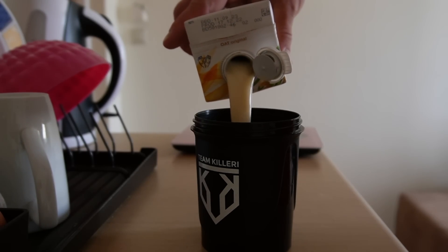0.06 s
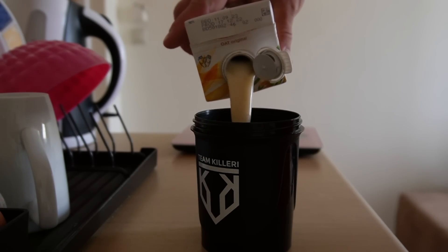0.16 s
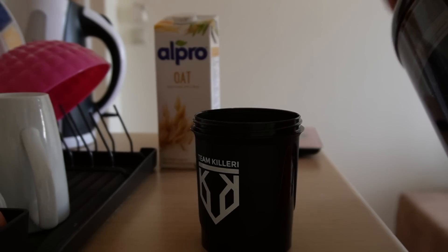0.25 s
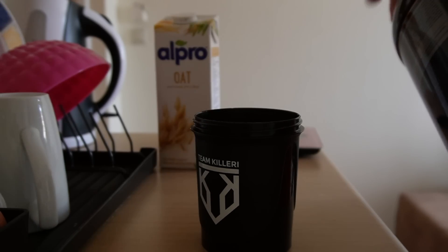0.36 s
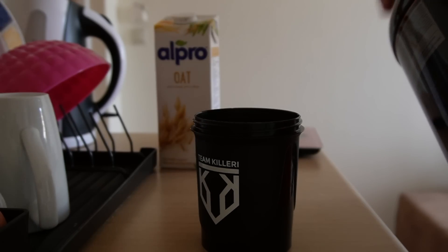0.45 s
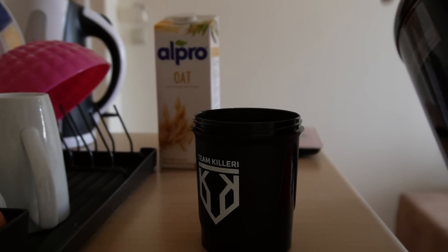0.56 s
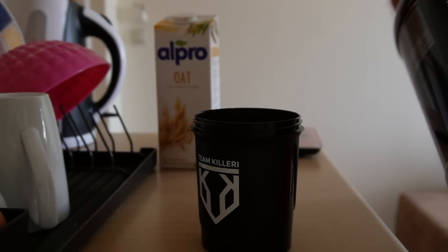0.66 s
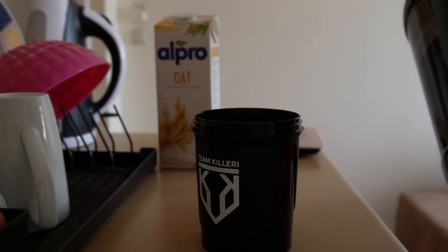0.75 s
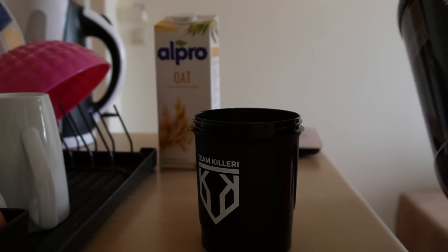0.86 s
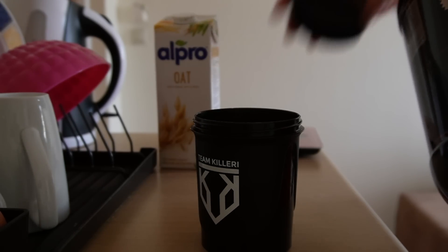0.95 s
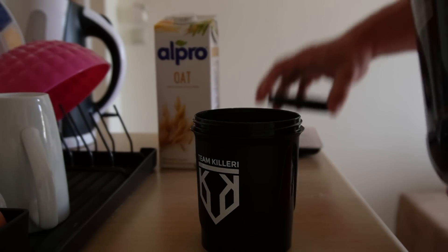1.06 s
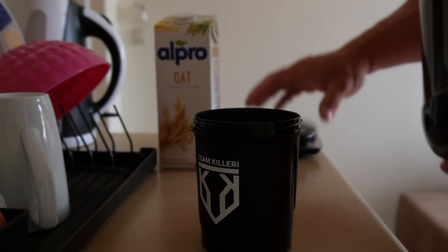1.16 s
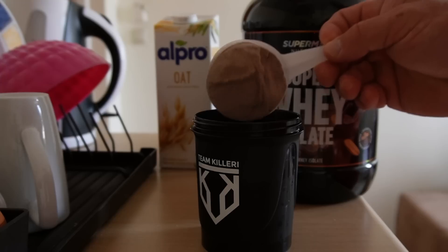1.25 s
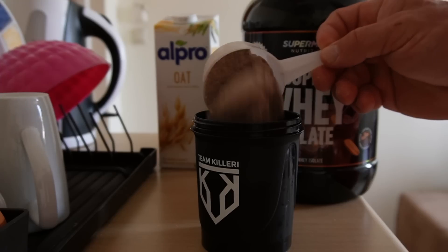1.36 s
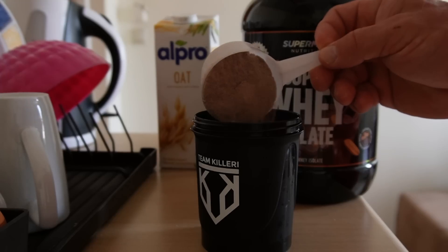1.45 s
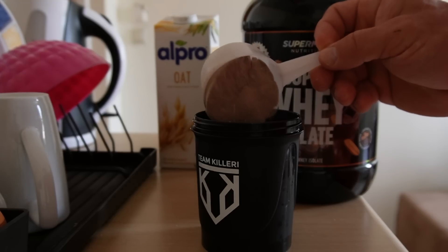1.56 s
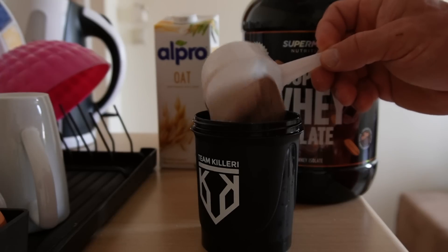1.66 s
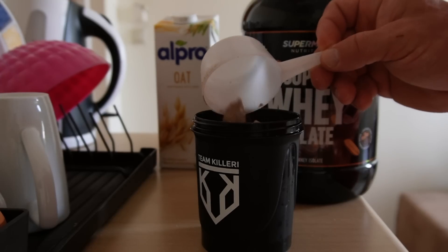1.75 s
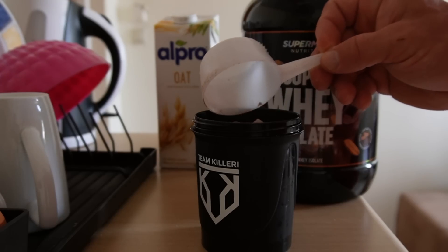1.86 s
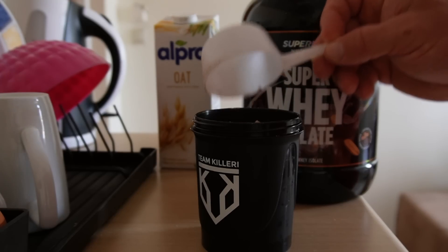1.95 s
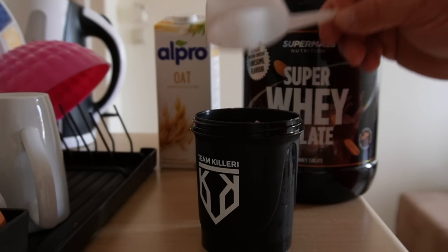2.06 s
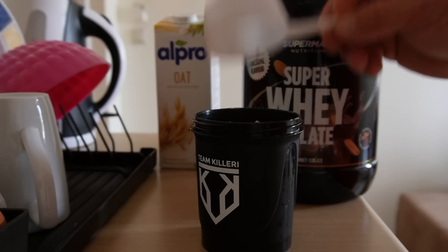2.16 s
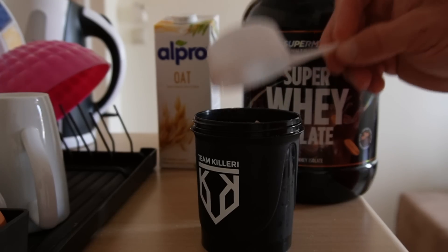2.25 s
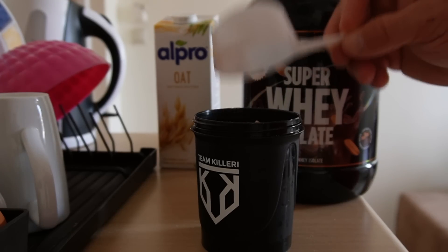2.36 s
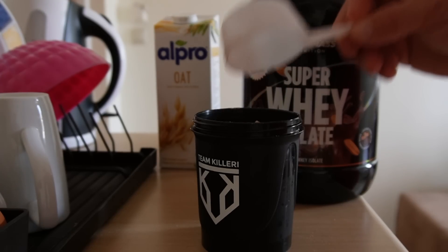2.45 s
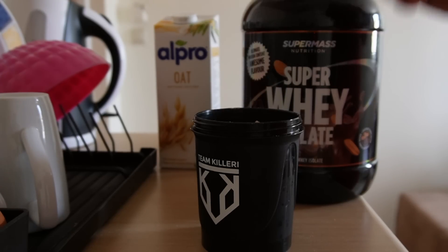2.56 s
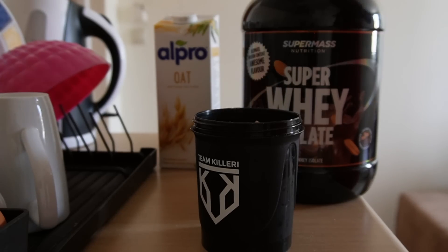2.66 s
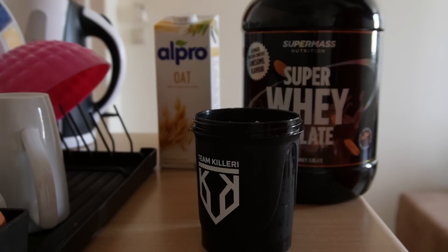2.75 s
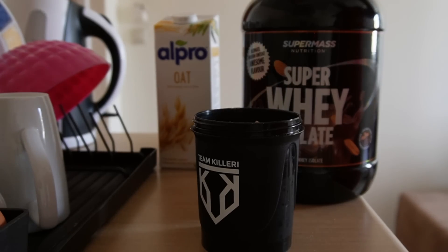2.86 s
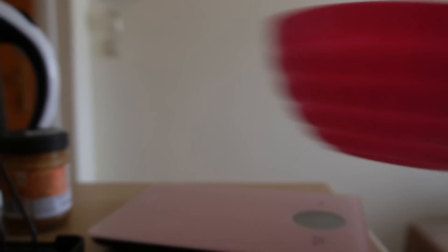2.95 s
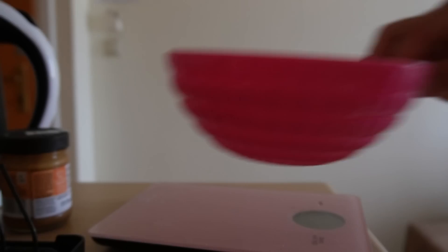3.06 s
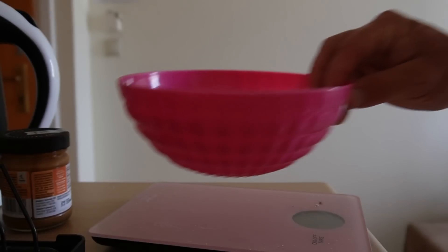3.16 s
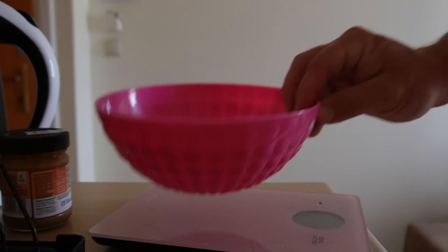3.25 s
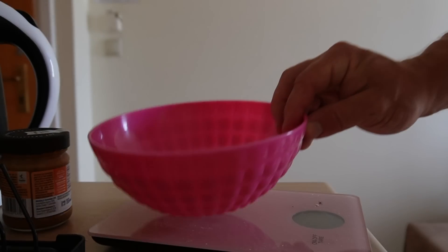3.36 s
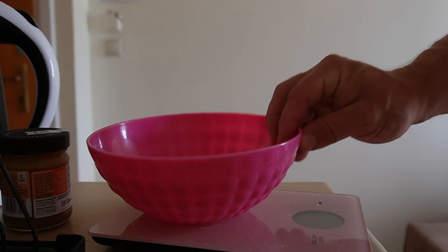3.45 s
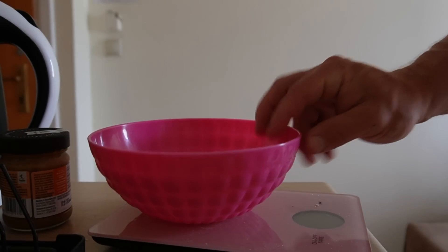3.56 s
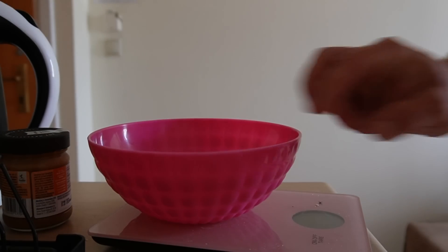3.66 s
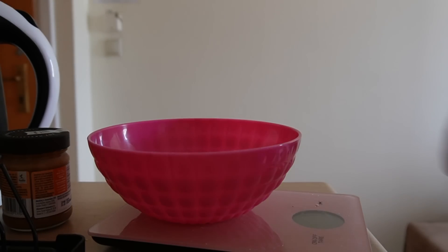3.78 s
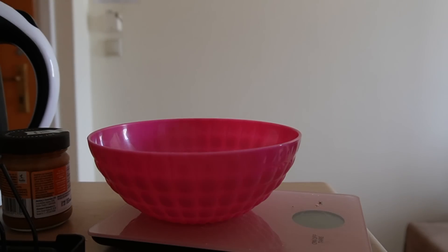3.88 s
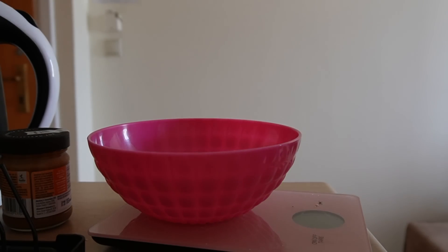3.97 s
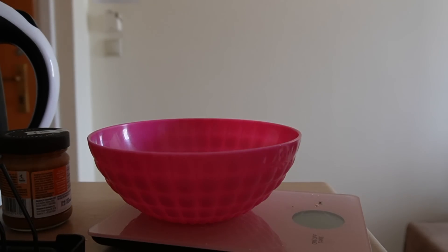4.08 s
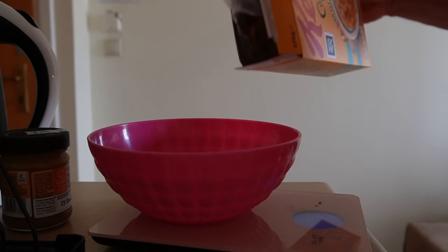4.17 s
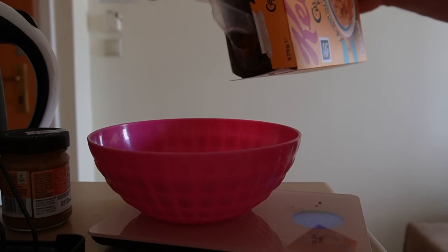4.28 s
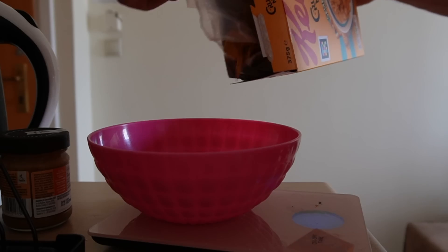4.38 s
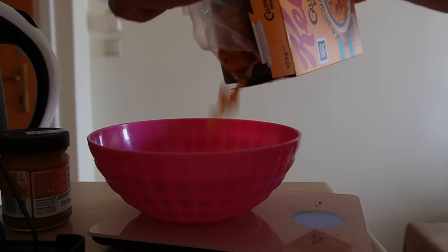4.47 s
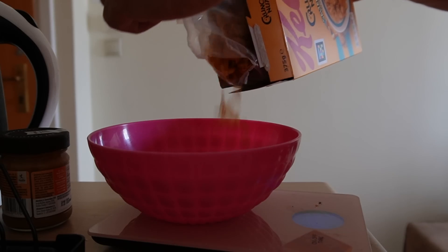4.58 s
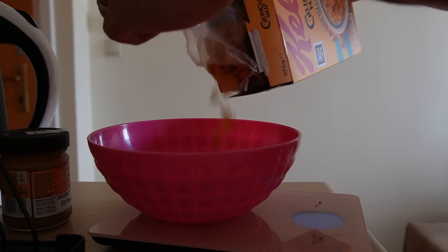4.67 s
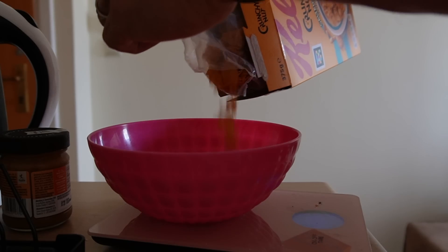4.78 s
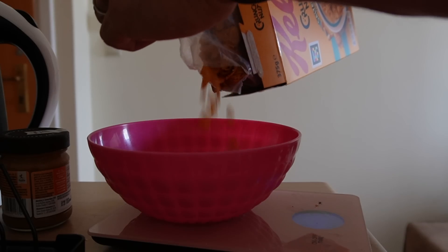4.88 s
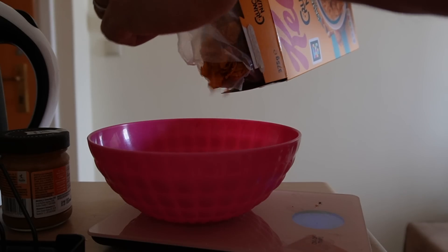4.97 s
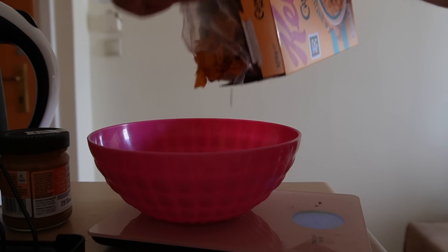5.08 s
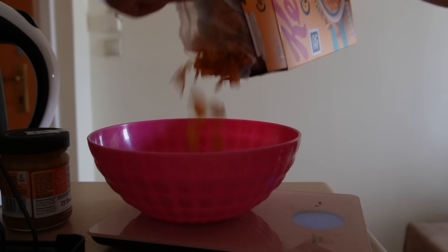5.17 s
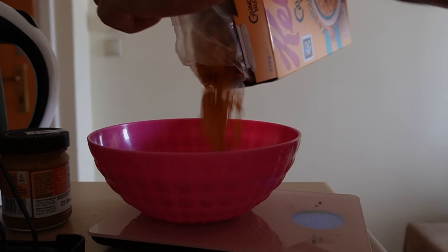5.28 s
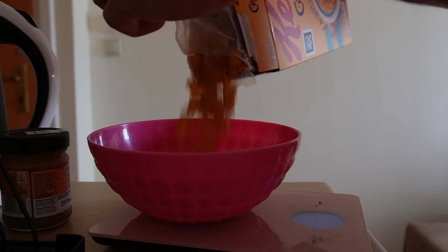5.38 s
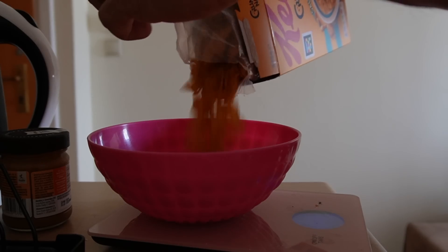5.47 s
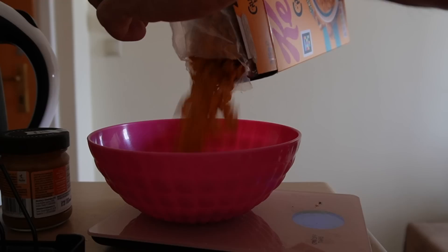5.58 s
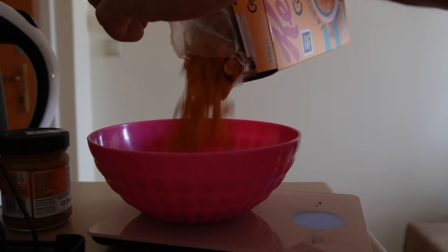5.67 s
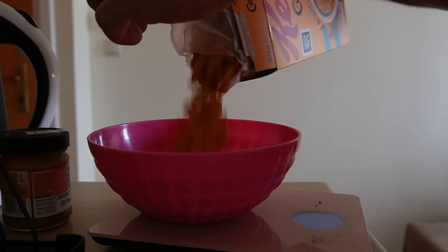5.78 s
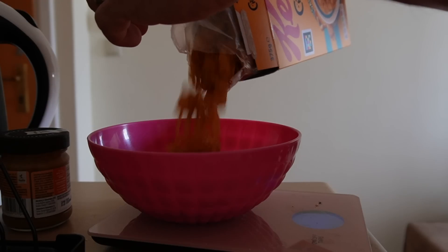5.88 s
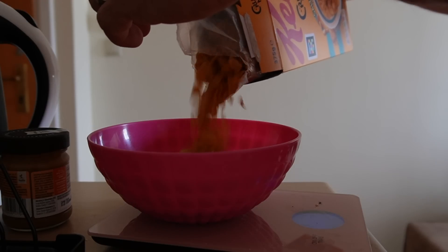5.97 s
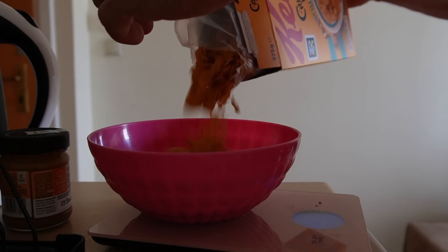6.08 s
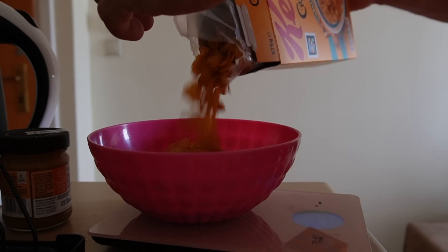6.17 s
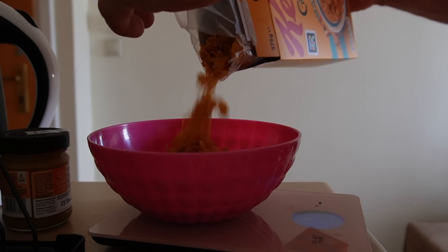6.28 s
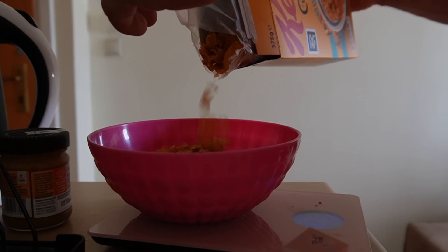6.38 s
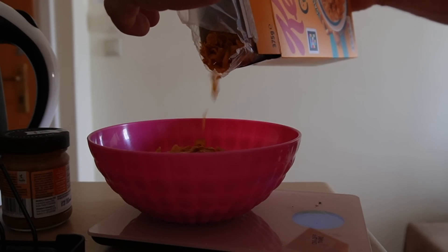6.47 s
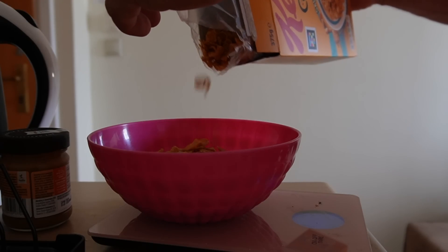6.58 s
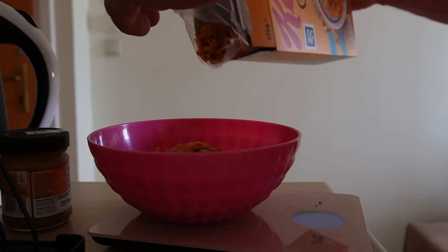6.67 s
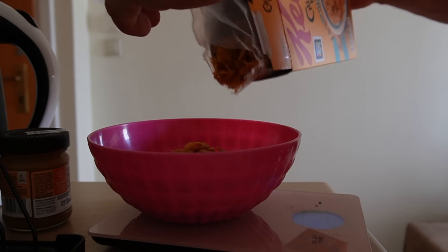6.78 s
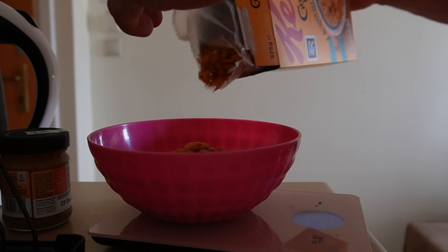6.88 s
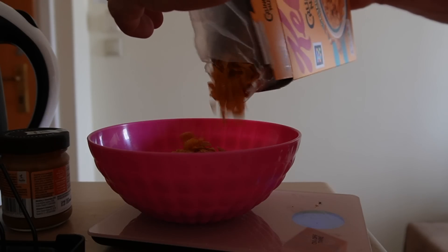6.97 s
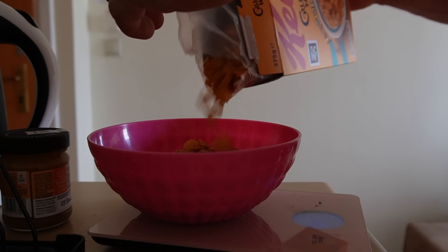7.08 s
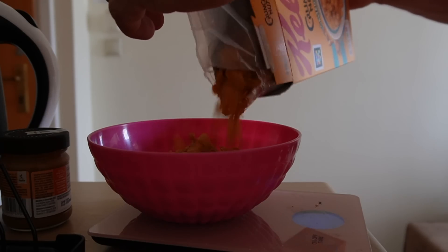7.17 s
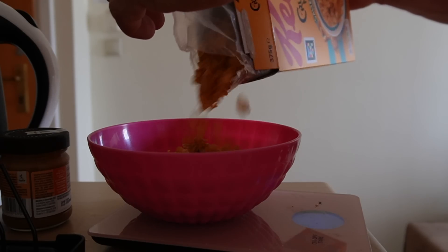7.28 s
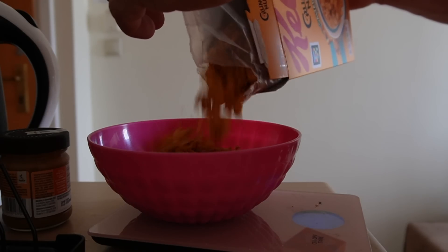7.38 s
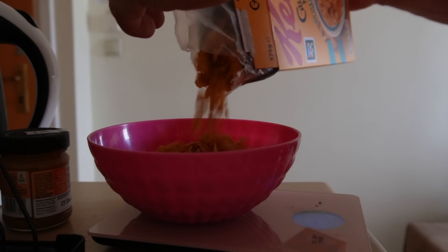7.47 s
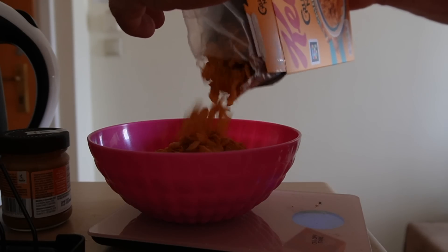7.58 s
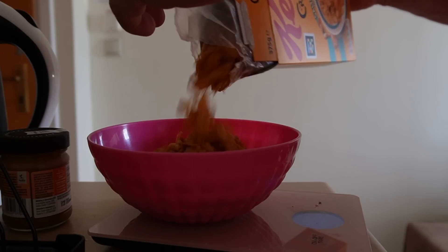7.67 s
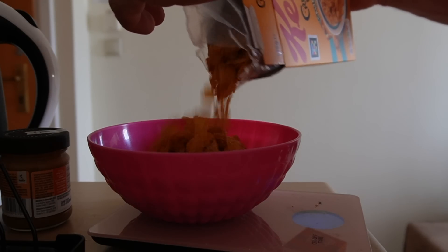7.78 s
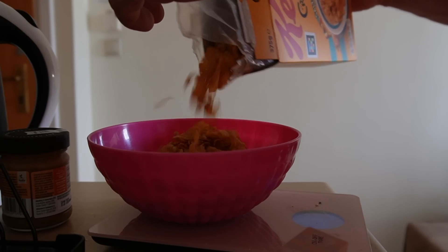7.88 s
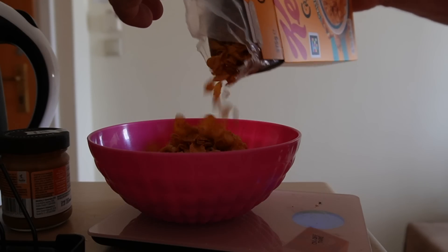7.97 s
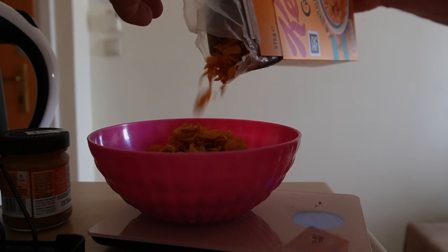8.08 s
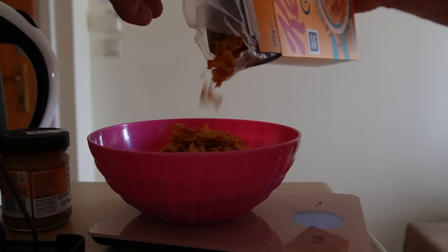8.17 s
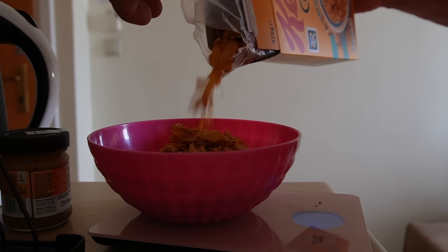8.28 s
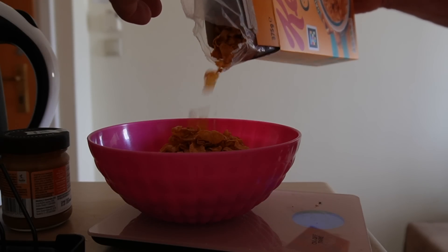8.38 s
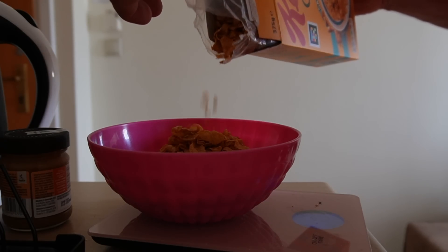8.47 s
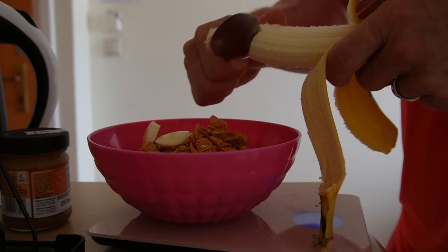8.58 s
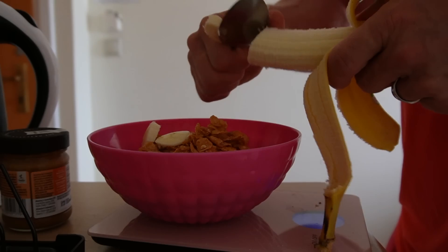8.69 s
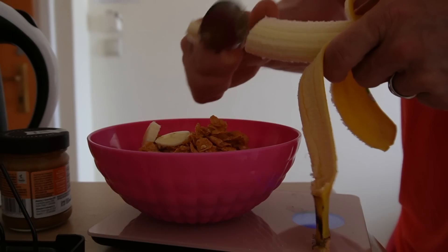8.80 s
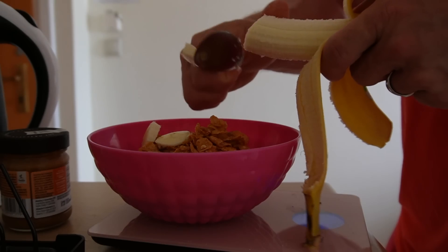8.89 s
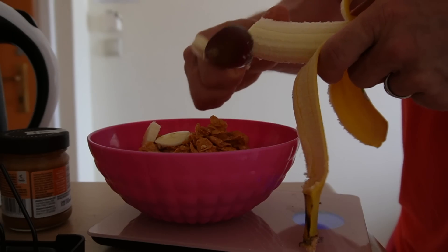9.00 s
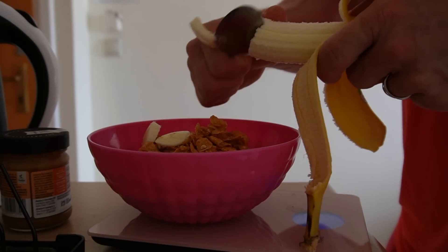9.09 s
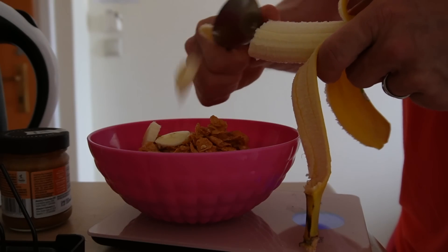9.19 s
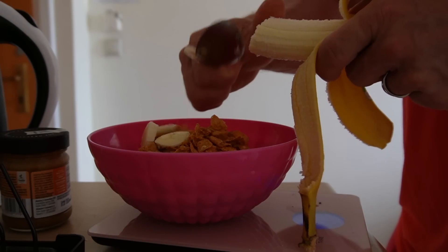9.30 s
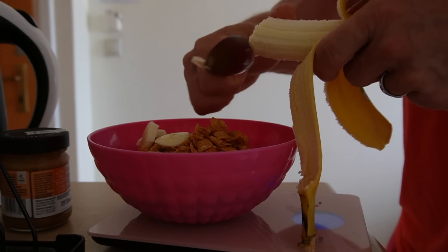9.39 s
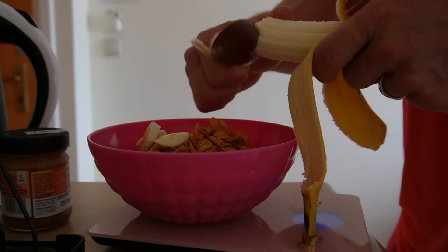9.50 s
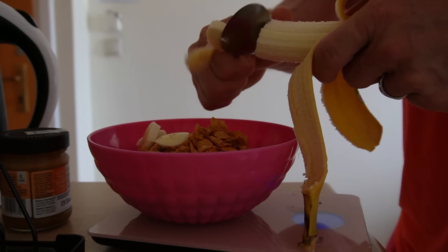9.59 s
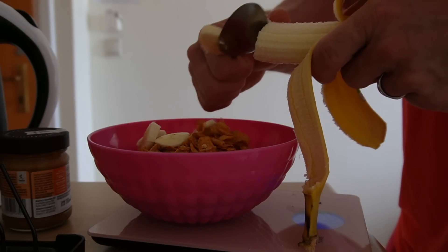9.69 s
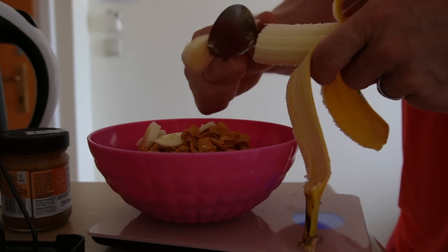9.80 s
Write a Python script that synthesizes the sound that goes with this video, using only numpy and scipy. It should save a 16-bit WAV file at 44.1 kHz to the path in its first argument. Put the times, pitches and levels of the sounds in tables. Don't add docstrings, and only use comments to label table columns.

```python
import sys
import numpy as np
from scipy import signal
from scipy.io import wavfile

SR = 44100
rng = np.random.default_rng(int(sys.argv[2]) if len(sys.argv) > 2 else 0)


def store_wav(level_fs):
    pcm = np.round(np.clip(np.atleast_2d(level_fs), -1, 1) * 32767)
    wavfile.write(sys.argv[1], SR, pcm.T.astype(np.int16))


def gain_from_db(level_db):
    decades = np.asarray(level_db, float) / 20
    return 10 ** decades


N = 433944

BANDS_HZ = 60 * 2 ** np.arange(0, 8.6, .4)
BANK = [signal.butter(2, edges, "band", fs=SR, output="sos") for edges in zip(BANDS_HZ, BANDS_HZ[1:])]
# pitch_hz, level_db [dB per Hz]
SLIDE_COLOUR = [(710, -16), (1200, -8.5), (1560, -14.5), (2200, 0.5), (2480, 1.5), (6370, -0.5),
                (10000, -4), (14800, -15), (16000, -19.5)]
# pitch_hz, level_db [dB per Hz]
CARTON_COLOUR = [(59, -70.5), (100, -49), (472, -17), (582, -1), (718, -20.5), (1000, -8), (1350, -13),
                 (1900, -3.5), (2470, -23), (4180, -61)]
# pitch_hz, width_hz, level_db
BOWL_FLOOR = [(2117, 40, -3), (2347, 176, 3.5), (2900, 1080, -0.5), (3310, 250, 4)]


def cut(x, hz, kind, order=2):
    return signal.sosfilt(signal.butter(order, hz, kind, fs=SR, output="sos"), x)


def at_hz(points, hz):
    table = np.array(points)
    return np.interp(np.log(hz), np.log(table[:, 0]), table[:, 1])


def level_curve(rows, column=1):
    table = np.array(rows)
    first, last = round(table[0, 0] * SR), min(round(table[-1, 0] * SR), N)
    return first, gain_from_db(np.interp(np.arange(first, last) / SR, table[:, 0], table[:, column]))


def stroke(s, db, rise_s, fall_s):
    quiet_db = db - 25
    return [(max(s - abs(rise_s), 0), quiet_db), (s, db), (s + abs(fall_s), quiet_db)]


def resonate(x, modes):
    out = np.zeros_like(x)
    size = x.shape[1]
    for k, (hz, width_hz, db) in enumerate(modes):
        r = np.exp(-np.pi * width_hz / SR)
        luck_db = 5 * rng.standard_normal(size // 40 + 1).repeat(40)[:size]
        driven = x * gain_from_db(db + luck_db) + 1e-18
        feedback = [1, -2 * r * np.cos(2 * np.pi * hz / SR), r * r]
        out += (-1) ** k * signal.lfilter([1 - r * r, 0, r * r - 1], feedback, driven)
    return out


def colour(x, spectrum, modes=(), ring_db=0.0):
    # pitch_hz, level_db
    side_levels = [(60, -36), (150, -35), (380, -28), (950, -18.5), (2380, -17), (5980, -9.5),
                   (15000, -1.5)]
    out = np.zeros_like(x)
    ringing = gain_from_db(ring_db) * resonate(x, modes) if modes else 0
    x = x + 1e-18 + ringing
    for k, hz in enumerate(np.sqrt(BANDS_HZ[:-1] * BANDS_HZ[1:])):
        if .8 * spectrum[0][0] < hz < 1.2 * spectrum[-1][0]:
            mid_and_side_db = at_hz(spectrum, hz) + np.array([[0], [at_hz(side_levels, hz)]])
            out += (-1) ** k * gain_from_db(mid_and_side_db) * signal.sosfilt(BANK[k], x)
    return out


def grains(rows, spectrum, per_s, uneven_db, clump_db, modes=(), ring_db=0.0, column=1):
    first, gain = level_curve(rows, column)
    size = len(gain)
    knots = rng.standard_normal(size // 500 + 2)
    clumps = gain_from_db(clump_db * np.interp(np.arange(size) / 500, np.arange(len(knots)), knots))
    strengths = gain_from_db(uneven_db * np.minimum(rng.exponential(1, size), 5))
    signs = np.sign(rng.random(size) - .5)
    touching = rng.random(size) < per_s / SR
    clicks = gain * strengths * signs * clumps * touching
    directions = np.stack([np.ones(size), rng.standard_normal(size)])
    sound = colour(clicks * directions, spectrum, modes, ring_db)
    out = np.zeros((2, N))
    out[:, first:first + size] = sound * np.sqrt(np.mean(gain ** 2) / np.mean(sound[0] ** 2))
    return out


def blows(events, spectrum, tail_db, modes=(), ring_db=0.0, split_hz=1110.0, crack_s=0.00069,
          tail_s=0.18, sides=("high", "low")):
    out = np.zeros((2, N))
    for s, db, other_db, *t60 in events:
        dying_s = t60[0] if t60 else tail_s
        t = np.arange(min(9000, 1000 + round(dying_s * SR))) / SR
        shape = np.exp(-t / crack_s) + gain_from_db(tail_db - 60 * t / max(dying_s, .005))
        first_touch = 4 * (t == 0) * [[1], [0]]
        chatter = rng.standard_normal((2, len(t))) + first_touch
        burst = colour(chatter * shape, spectrum, modes, ring_db)
        main, other = (cut(burst, split_hz, kind) for kind in sides)
        burst = main / np.abs(main[0]).max() + gain_from_db(other_db) * other / np.abs(other[0]).max()
        at = round(s * SR)
        out[:, at:at + len(t)] += gain_from_db(db) * burst[:, :N - at]
    return out


def ring(events, modes, gain_db, size=N):
    out = np.zeros((2, size))
    at = [round(row[0] * SR) for row in events]
    for hz, db, t60 in modes:
        clicks = np.zeros(size)
        clicks[at] = gain_from_db(np.array([row[1] for row in events]) + db + gain_db + rng.normal(0, 2.0, len(at)))
        r, w = gain_from_db(-60 / (t60 * SR)), 2 * np.pi * hz / SR
        out[0] += signal.lfilter([0, np.sin(w)], [1, -2 * r * np.cos(w), r * r], clicks + 1e-18)
    return out


def pings(events, t60, gain_db, under_db=-6, rise_s=0.00073):
    out = np.zeros((2, N))
    rise = 1 - np.exp(-np.arange(8000) / SR / rise_s)
    for s, db, *_, hz in events:
        modes = [(hz, 0, t60), (0.64 * hz, under_db, 0.43 * t60)]
        pair = rise * ring([(0.00079, db)], modes, gain_db, size=8000)[0]
        pair = cut(cut(pair, 0.82 * hz, "high"), 4.1 * hz, "low")
        at = round(s * SR)
        out[0, at:at + len(pair)] += pair[:N - at]
    return out


def room_tone():
    # time_s, level_db
    tone = [
        [(0.0, -56.5), (0.508, -54.5), (1.2, -57.5)],
        [(1.28, -54.5), (2.02, -62.5), (2.9, -61)],
        [(2.92, -62), (3.728, -55.5), (4.12, -58)],
        [(8.58, -57), (8.762, -59), (9.84, -59)],
    ]
    # pitch_hz, level_db [dB per Hz]
    tone_colour = [(24, -48), (40, -14.5), (167, -14.5), (262, -11), (297, -15), (345, -10), (556, -9.5),
                   (918, -4.5), (2440, -3), (3060, -14), (3300, -3.5), (16000, -32.5)]
    hiss = grains(sum(tone, []), tone_colour, per_s=42000, uneven_db=1.5, clump_db=1.04)
    return gain_from_db([[2.5], [9]]) * hiss


def brushing_hands():
    # peak_s, level_db, rise_s, fall_s
    brush = [(0.005, -60, 0.0075, 0.1), (0.277, -38, 0.04, 0.71), (0.775, -24.5, 0.088, 0.099),
             (1.717, -50, 0.24, 0.12), (2.678, -55.5, 0.4, 0.24), (3.504, -42.5, 0.015, 0.33),
             (3.71, -44, 0.021, 0.1), (8.581, -51.5, 0.0034, .2), (8.663, -44.5, 0.057, 0.072),
             (9.56, -47.5, 0.057, 0.087), (9.185, -48, 0.21, 0.064), (1.1, -52.5, 0.3, 0.17)]
    # start_s, peak_db, low_part_db
    ticks = [(1.3952, -40, -21), (1.4536, -35, -4.5), (1.54, -32, -7), (1.6861, -29.5, -30),
             (8.6894, -42, -29), (9.0793, -36, -11), (9.1894, -45, -23), (9.5998, -31, -22)]
    # pitch_hz, level_db [dB per Hz]
    brush_colour = [(880, -21), (1500, -9.5), (2140, -13.5), (2490, -8.5), (6240, -7), (16000, -30)]
    rubbing = sum(grains(stroke(*row), brush_colour, per_s=2600, uneven_db=-3.5, clump_db=3.0)
                  for row in brush)
    return rubbing + blows(ticks, brush_colour, tail_db=-9, split_hz=1100.0, crack_s=0.00032)


def last_drips():
    # start_s, peak_db, pitch_hz
    glugs = [(0.009, -40, 4760), (0.0248, -31, 2730), (0.048, -47, 2900), (0.076, -44, 2800),
             (0.0945, -37, 2870), (0.109, -42, 2780), (0.1105, -41.5, 4200), (0.1225, -31, 2740),
             (0.156, -40, 4170)]
    return pings(glugs, t60=0.018, gain_db=6.0, under_db=-7, rise_s=0.001)


def birds_and_whines():
    # start_s, end_s, pitch_hz, width_hz, level_db
    steady = [(2.905, 3.15, 3530, 90, -60), (2.905, 3.1, 5150, 280, -57), (3.03, 3.47, 4430, 60, -53.5),
              (3.47, 3.78, 4400, 90, -58), (3.1, 3.47, 4900, 500, -63), (3.78, 4.135, 4330, 80, -55.5),
              (0.55, 1.5, 4500, 500, -60), (0.211, 0.27, 2350, 200, -45), (0.211, 0.27, 4500, 500, -47),
              (0.156, 0.21, 4400, 600, -54), (1.8, 2.7, 262, 20, -78)]
    # start_s, end_s, pitch_hz
    chirps = [
        (8.76, 8.82, 5050),
        (8.88, 8.97, 5450),
        (8.99, 9.07, 5900),
    ]
    rise_hz_per_s, chirp_width_hz, chirp_db = 2500, 140, -63.5
    notes = [(*row, 0) for row in steady]
    notes += [(*row, chirp_width_hz, chirp_db, rise_hz_per_s) for row in chirps]
    out = np.zeros((2, N))
    for start, end, hz, width_hz, db, rise in notes:
        first, size = round(start * SR), round((end - start) * SR)
        smoothing = [1, -np.exp(-np.pi * width_hz / SR)]
        blur = signal.lfilter([1], smoothing, rng.standard_normal((2, size)))
        turn = np.cumsum(2 * np.pi * (hz + rise * np.arange(size) / SR) / SR)
        note = blur[0] * np.cos(turn) + blur[1] * np.sin(turn)
        out[0, first:first + size] += gain_from_db(db) * note / note.std() * signal.windows.tukey(size, .06)
    return out


def tub_lid():
    # peak_s, level_db, rise_s, fall_s
    rattle = [
        (0.281, -20, 0.021, 0.26),
        (0.495, -21.5, .018, 0.12),
        (0.765, -28, .1, 0.14),
    ]
    # start_s, peak_db, low_thump_db, pitch_hz
    knocks = [(0.264, -13, -4, 2130), (0.2735, -13, -16, 1750), (0.28, -18, -33, 2400),
              (0.289, -3, -11.5, 2920), (0.303, -10, -15, 2900), (0.349, -9, -20, 2770),
              (0.362, -2, -30, 1750), (0.3791, -22.5, 1, 1750), (0.4803, -16, -2, 2580),
              (0.494, -13.5, -20, 1660), (0.508, -8, -16, 2880), (0.5246, -8.5, -20, 1750),
              (0.56, -15.5, -11.5, 1790), (0.682, -30, -4, 2180), (0.697, -21, -29, 2850),
              (0.706, -10.5, -37, 2050), (0.7224, -6.5, -10.5, 1940), (0.7293, -9, -5, 1750),
              (0.769, -10.5, -18.5, 1810), (0.775, -6.5, -15.5, 1890), (0.7793, -9, -9, 1820)]
    # pitch_hz, level_db [dB per Hz]
    tub_colour = [(41, -62), (70, -31), (178, -11), (403, -9), (472, -10.5), (593, -21.5), (711, 1.5),
                  (1310, -8.5), (1730, 9), (2910, -10), (3260, -11.5), (4800, -9.5), (16000, -43)]
    # pitch_hz, width_hz, level_db
    tub_modes = [(479.5, 33, 13), (1750, 51, -1.5), (2580, 260, -10), (2900, 37, 2.5), (3480, 110, -31),
                 (3700, 150, -42), (4600, 370, -10)]
    shaking = sum(grains(stroke(*row), tub_colour, per_s=2500, uneven_db=2.8, clump_db=2.5,
                         modes=tub_modes, ring_db=-2.0) for row in rattle)
    hits = blows([row[:3] for row in knocks], tub_colour, tail_db=-12, tail_s=0.066,
                 modes=tub_modes, ring_db=2.0)
    return shaking + hits + pings(knocks, t60=0.024, gain_db=-3.5)


def twisted_cap():
    # time_s, level_db
    twist = [(1.201, -17), (1.272, -17)]
    # start_s, peak_db, low_part_db
    slips = [(1.2008, -10.5, 6), (1.2062, -10, -9), (1.2113, -3.5, -5), (1.2238, -4.5, -11),
             (1.2468, -8, -4), (1.2555, -7, -12), (1.2665, -12.5, -6)]
    # pitch_hz, level_db [dB per Hz]
    cap_colour = [(88, -67), (150, -30), (448, -34), (637, -9.5), (979, -16.5), (1340, 6.5), (1900, -1),
                  (2500, -12.5), (3040, 1.5), (5250, -9.5), (16000, -56)]
    # pitch_hz, width_hz, level_db
    cap_modes = [(1290, 25, -26), (1690, 19, 2), (2445, 110, 5)]
    scrape = grains(twist, cap_colour, per_s=2500, uneven_db=2.0, clump_db=2.0, modes=cap_modes, ring_db=3.0)
    catches = blows(slips, cap_colour, tail_db=-9.5, modes=cap_modes, split_hz=2800.0,
                    crack_s=0.00046, tail_s=.02)
    return scrape + catches * (np.arange(N) < 1.273 * SR)


def scoop_tap():
    # start_s, peak_db, pitch_hz
    taps = [(1.684, -45, 1080)]
    return pings(taps, t60=0.1, gain_db=4.0)


def bowl_set_down():
    # start_s, peak_db, low_part_db, dying_s
    bounces = [(3.4648, -4, -2.5, 0.27), (3.489, -12, 0.5, 0.63), (3.535, -18, -12, 0.1),
               (3.594, -20, -6, 0.15), (3.6215, -23, -4, 0.06), (3.6365, -25.5, -10, 0.06),
               (3.655, -26, -4, 0.11), (3.665, -22.5, -4, 0.08), (3.7097, -13.5, 1, 0.092),
               (3.7305, -24, -3, 0.15), (3.751, -21.5, -7, 0.16)]
    # pitch_hz, level_db [dB per Hz]
    set_colour = [(47, -55), (80, -25), (136, -56), (482, 2.5), (588, 6.5), (1070, 5), (1170, 12),
                  (1310, 12.5), (2400, 4), (4730, -9.5), (16000, -45.5)]
    # pitch_hz, level_db, dying_s
    shell = [(608, -6, 0.4), (930, -5, 0.2), (1230, 1, 0.088), (1490, 3, 0.13), (2330, 4.5, 0.14),
             (2600, -1.5, 0.15), (2920, -0.5, 0.13)]
    clatter = blows(bounces, set_colour, tail_db=-9, split_hz=1900.0, crack_s=.001)
    clatter += ring(bounces, [(hz, db, t60 / 2) for hz, db, t60 in shell], gain_db=-24)
    plate = [(150, -36, .35), (159, -29.0, .3)]
    hum = ring(bounces[1:], plate, gain_db=-2.5)
    return cut(clatter + cut(hum, 220, "low"), 120, "high", order=4)


def with_fading(pours, leads_db, loss_db_per_s, jolts, settle_s):
    rows = []
    for pour_rows, lead_db in zip(pours, leads_db):
        s, db = np.transpose(pour_rows)
        t = np.arange(s[0], s[-1], .004)
        flow = np.interp(t, s, db)
        for at, gain_db in jolts:
            flow = flow + gain_db * (t >= at) * np.exp(-np.abs(t - at) / settle_s)
        rows += zip(t, flow, flow + lead_db - loss_db_per_s * (t - s[0]))
    return rows


def sliding_flakes():
    # time_s, level_db
    tilts = [
        [(4.13, -34), (4.27, -34), (4.46, -31), (4.99, -24.5), (5.53, -19), (6.1, -21.5), (6.37, -24),
         (6.63, -38), (6.74, -58)],
        [(6.74, -61.5), (6.8, -40.5), (6.89, -37.5), (7.1, -26), (7.48, -23), (7.99, -25.5), (8.12, -32),
         (8.4, -34), (8.573, -44.5)],
    ]
    # start_s, gain_db
    shakes = [(4.31, 7.5), (4.76, -3.5), (5.135, -1.5), (5.24, 3), (5.48, 0.5), (6.697, 22), (7.07, 0.5),
              (7.43, 2.5), (7.485, 0.5), (7.62, 2), (7.819, 4), (7.985, 2.5), (8.255, 2.5), (8.359, 5),
              (8.43, 8), (8.55, 5)]
    # start_s, peak_db, low_part_db
    bag_crunches = [(4.1305, -23.5, -15), (4.157, -19, -27), (4.2035, -10, -30), (4.2158, -6.5, -42),
                    (4.252, -13, -17), (4.4029, -6.5, -11.5), (4.513, -18.5, -17)]
    slide = with_fading(tilts, leads_db=[-3, -4], loss_db_per_s=9, jolts=shakes, settle_s=0.098)
    bag = gain_from_db(4) * grains(slide, SLIDE_COLOUR, per_s=9000, uneven_db=3.0, clump_db=2.5)
    carton = grains(slide, CARTON_COLOUR, per_s=4000, uneven_db=2.2, clump_db=3.0, column=2)
    crunches = blows(bag_crunches, SLIDE_COLOUR, tail_db=-0.5, split_hz=1200.0, crack_s=.001, tail_s=0.045)
    return bag + carton + crunches


def snapping_edges():
    # start_s, peak_db
    cracks = [(4.131, -34), (4.159, -17.5), (4.2047, -28), (4.216, -21.5), (4.2532, -21.5), (4.5467, -17.5),
              (4.555, -15), (4.5844, -12), (4.653, -14), (4.689, -10), (4.704, -2.5), (4.7622, -9.5),
              (4.776, -6.5), (4.787, -4), (4.809, -10), (4.8505, -7), (4.887, -11), (4.931, -9),
              (4.9384, -10.5), (4.9904, -9), (4.9625, -9.5), (5.1363, -7), (5.24, -12.5), (5.2653, 6.5),
              (5.8046, 6), (6.5739, -25.5), (6.603, -20), (6.7, -20.5), (6.7754, -31), (6.7833, -30),
              (6.9103, -28), (6.9298, -30.5), (6.9507, -25.5), (7.0712, -14), (7.3363, -18.5), (7.4432, 30),
              (7.8683, -20), (8.0432, -10.5), (8.166, -16), (8.2607, -22.5), (8.3239, -14), (8.4256, -17),
              (8.4856, -20.5), (8.5498, -28.5), (8.5592, -22.5)]
    snap_db, spray_db, spray_s, thud_db = 16.5, -18, 0.0091, -9
    s, db = np.transpose(cracks)
    first, last = round(s.min() * SR), round(s.max() * SR) + 2000
    at = (s * SR).round().astype(int) - first
    directions = np.stack([np.ones(len(s)), rng.uniform(-1, 1, len(s))])
    clicks = np.zeros((2, last - first))
    clicks[:, at] = gain_from_db(np.minimum(db, -4) + snap_db) * directions
    crumbs = rng.standard_normal(clicks.shape) * (rng.random(last - first) < .2)
    scatter = signal.lfilter([1], [1, -np.exp(-1 / (spray_s * SR))], clicks[0] + 1e-18)
    spray = gain_from_db(spray_db) * crumbs * scatter
    bright = cut(colour(clicks + spray, SLIDE_COLOUR), 5020, "high")
    thud = cut(colour(clicks, CARTON_COLOUR), 1800, "low")
    out = np.zeros((2, N))
    out[:, first:last] = bright + gain_from_db(thud_db) * thud
    return out


def landing_flakes():
    # time_s, level_db
    streams = [
        [(4.57, -30), (4.6, -16.5), (5.19, -19), (5.37, -17.5), (6.14, -13.5), (6.23, -21), (6.46, -22),
         (6.6, -26.5), (6.77, -49.5)],
        [(6.77, -44), (6.79, -27.5), (7.29, -31), (7.4, -18), (7.75, -40), (7.96, -18.5), (8.28, -52),
         (8.46, -31), (8.573, -38.5)],
    ]
    # start_s, gain_db
    surges = [(4.583, 2.5), (4.652, 3), (4.76, 0), (4.809, 2.5), (4.885, 5), (5.05, 9.5), (5.136, -1),
              (5.24, -1.5), (5.327, 2.5), (5.485, 4), (5.69, -3.5), (6.076, -2.5), (6.38, 1), (7.068, -2),
              (7.676, 2), (7.916, 6)]
    # start_s, peak_db, treble_against_peak_db
    hard_landings = [(4.5448, 1.5, 2.5), (4.5548, 4, 1), (4.5827, 1.5, -0.5), (4.5997, -1, 1.5),
                     (4.6526, -8, 2), (4.6571, -3.5, -2), (4.6705, -4, -1), (4.7489, -7, -1),
                     (4.7613, -4.5, 0), (4.7893, -3.5, -1.5), (4.8092, 0, -2.5), (4.8396, -2.5, 0),
                     (4.8706, -4, 1.5), (4.8855, -2, -0.5), (4.906, -2, 1), (4.9629, -3.5, 0.5),
                     (4.9893, -2.5, 0), (5.0497, -4, -1), (5.136, -1, -1), (5.1874, -6, -1.5),
                     (5.2407, -3, -4), (5.2647, -2.5, -4), (5.2986, -11, -2.5), (5.2986, -10, -1),
                     (5.2986, -4.5, -1.5), (5.3265, -7, -1), (5.3325, -5, -2.5), (5.3939, -0.5, -2),
                     (5.4423, -4.5, -1.5), (5.4732, -6.5, -2), (5.6488, -5, -3.5), (5.6568, -6, 0.5),
                     (5.6882, -6.5, -3), (5.6987, -7, -3.5), (5.7331, -1, -3), (5.7541, -5, -3),
                     (5.8149, -3.5, -3.5), (5.8608, -3, -0.5), (5.9012, -3, -4), (5.9237, 0, -4.5),
                     (5.9541, -1, -2), (6.023, -4, 5), (6.0763, -3, -2), (6.1103, -2, -3.5),
                     (6.1197, -6, -2), (6.1427, -5.5, -5.5), (6.1601, -7, -1), (6.2674, -3, -3.5),
                     (6.3123, -7.5, -4), (6.3801, -21, -2), (6.3801, 0, -4), (6.3986, -6, -3),
                     (6.43, -4, -1.5), (6.443, -3.5, -3.5), (6.4684, -0.5, -4.5), (6.5104, -8, -3.5),
                     (6.5737, -4.5, -3), (6.6989, -14, 3),
                     (6.7753, -1.5, -5), (6.8177, -15.5, -3), (6.8357, -10, -4.5), (6.8731, -14, -5),
                   (6.8866, -14, -8.5), (6.9095, -10.5, -6), (6.9285, -7, -6), (6.9988, -14, -2.5),
                   (7.0677, -18, -2.5), (7.1135, 2.5, -3), (7.157, -10, -4.5), (7.2727, -13, -4),
                   (7.3051, -11, -4.5), (7.3555, -8, -3.5), (7.3879, -4.5, -1.5), (7.4667, -10, -4),
                   (7.4832, -7, -4), (7.5077, -7, 0), (7.5316, -1, -8), (7.6748, 0.5, -6),
                   (7.7426, -18, -2), (7.8184, -8, -3), (7.8244, -8, -3), (7.8673, -12.5, -2),
                   (7.9152, 1, -6.5), (7.9606, -6, -4.5), (8.0429, -9, -6), (8.0629, -1, -4.5),
                   (8.1028, -15, -3.5), (8.1272, -12.5, -7), (8.1547, 0.5, -7.5), (8.2135, -14.5, -3),
                   (8.237, -19, -2.5), (8.2574, -21, -3), (8.2979, -6.5, -9), (8.3238, -5, -6),
                   (8.4316, -9, -4), (8.4535, -3, -4), (8.462, -4, -6), (8.4899, -8, -5.5),
                   (8.5243, -15, -4), (8.5573, -24, -2)]
    # pitch_hz, level_db [dB per Hz]
    flake_colour = [(900, -18), (1700, -18.5), (2300, 4.5), (2900, 4.5), (3500, 1), (5000, 6.5),
                    (9000, -32.5), (15000, -33)]
    # pitch_hz, level_db [dB per Hz]
    bowl_colour = [(1120, -33), (1900, 13.5), (2360, 5), (2770, 6), (4170, 2), (4540, 9.5), (12000, -50),
                   (15600, -59), (22000, -120)]
    # pitch_hz, width_hz, level_db
    wall_modes = [(4130, 240, -6.5), (4904, 73, -4), (5420, 72, -7.5), (5760, 93, 4), (7600, 1380, 3.5)]
    landing = with_fading(streams, leads_db=[7.5, 1], loss_db_per_s=6.5, jolts=surges, settle_s=0.033)
    chips = gain_from_db(-21) * grains(landing, SLIDE_COLOUR, per_s=90, uneven_db=3.0, clump_db=.3, column=2)
    floor = grains(landing, bowl_colour, per_s=1400, uneven_db=2.0, clump_db=1.5,
                   modes=BOWL_FLOOR, ring_db=37.5)
    wall = grains(landing, bowl_colour, per_s=1400, uneven_db=1.0, clump_db=2.5,
                  modes=wall_modes, ring_db=4.0, column=2)
    single = blows(hard_landings, flake_colour, tail_db=-19.5, modes=BOWL_FLOOR + wall_modes,
                   ring_db=0.5, split_hz=3130.0, crack_s=.0002, tail_s=0.024, sides=("low", "high"))
    stream = gain_from_db(-3.0) * cut(floor, 3260, "low") + gain_from_db(-3.5) * cut(wall, 3400, "high")
    return chips + cut(stream, 1900, "high", order=4) + gain_from_db(2.0) * cut(single, 1500, "high")


def fruit_slices():
    # start_s, level_db, fall_s
    crushing = [
        (9.286, -28, 0.2),
        (9.718, -32.5, 0.18),
        (9.749, -38, 0.11),
    ]
    # start_s, peak_db, low_part_db, dying_s
    snaps = [(9.2862, -16, -41, 0.07), (9.2905, -13, -36, 0.03), (9.3485, -30.5, -39, 0.02),
             (9.4155, -22, -44, 0.018), (9.717, -25, -32, 0.036), (9.7496, -15.5, -28, 0.032)]
    # start_s, peak_db, pitch_hz
    tumbles = [(9.3415, -19, 2470), (9.3485, -26, 2480), (9.365, -26, 2560), (9.431, -38, 2520),
               (9.453, -42, 2500)]
    # pitch_hz, level_db [dB per Hz]
    crunch_colour = [(180, -75), (300, -33), (828, -18.5), (1010, -18), (1580, -21.5), (2440, -9),
                     (3640, -7), (5520, -5.5), (10000, -11.5), (16000, -26.5)]
    crunch = sum(grains(stroke(s, db, 64 / SR, fall_s), crunch_colour, per_s=6400, uneven_db=-2.5,
                        clump_db=1.5) for s, db, fall_s in crushing)
    snapping = blows(snaps, crunch_colour, tail_db=23.5, modes=BOWL_FLOOR, ring_db=-45.0,
                     split_hz=1200.0, crack_s=0.0013)
    return crunch + snapping + pings(tumbles, t60=0.013, gain_db=6.0, under_db=-20)


def kitchen(x, start, end):
    t60_s, wet_db, wall_hz = 0.39, -17.5, 5000
    t = np.arange(round(.6 * SR)) / SR
    echo = rng.standard_normal((2, len(t))) * gain_from_db(-60 * t / t60_s) * (t > .004)
    echo = cut(echo, wall_hz, "low", order=1)
    echo = echo / np.sqrt(np.sum(echo[0] ** 2))
    first, last = round(start * SR), round(end * SR)
    part = x[:, first:last]
    wet = signal.fftconvolve(part[:1], echo, axes=1)[:, :last - first]
    wet[1] = gain_from_db(-10.0) * cut(wet[1], 3000, "high", order=1)
    closing = np.minimum(1, np.arange(last - first, 0, -1) / 130)
    out = np.zeros((2, N))
    out[:, first:last] = (part + gain_from_db(wet_db) * wet) * closing
    return out


def scene():
    near = brushing_hands() + last_drips() + tub_lid() + twisted_cap() + scoop_tap()
    near += bowl_set_down() + sliding_flakes() + snapping_edges() + landing_flakes() + fruit_slices()
    changes_s = [0, 1.2, 1.273, 4.131, 8.573, N / SR]
    takes = sum(kitchen(near, start, end) for start, end in zip(changes_s, changes_s[1:]))
    mid, side = takes + birds_and_whines() + room_tone()
    side = side + .25 * np.gradient(mid)
    return np.stack([(mid + side) * gain_from_db(-0.05), (mid - side) * gain_from_db(-0.38)])


def low_pass(x):
    return signal.sosfilt(signal.butter(12, 15900, fs=SR, output="sos"), x)


def record(dry):
    overload = np.clip(dry, -.82, .82) - dry
    shaved = dry + cut(overload, 500, "high")
    treble_limit = signal.cheby2(20, 60, 16250, fs=SR, output="sos")
    mix = np.clip(signal.sosfilt(treble_limit, shaved), -1, 1)
    return low_pass(mix)


dry = scene()
out = record(dry)
store_wav(out)
```